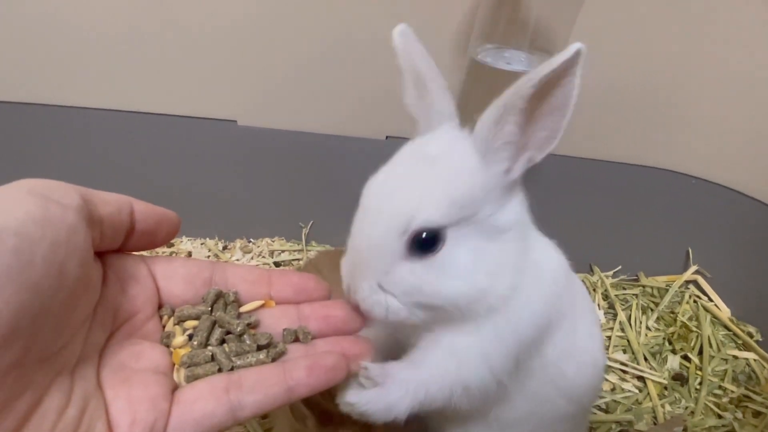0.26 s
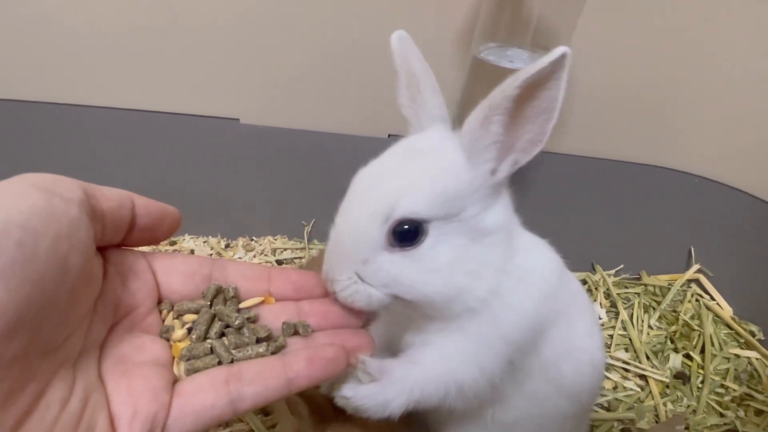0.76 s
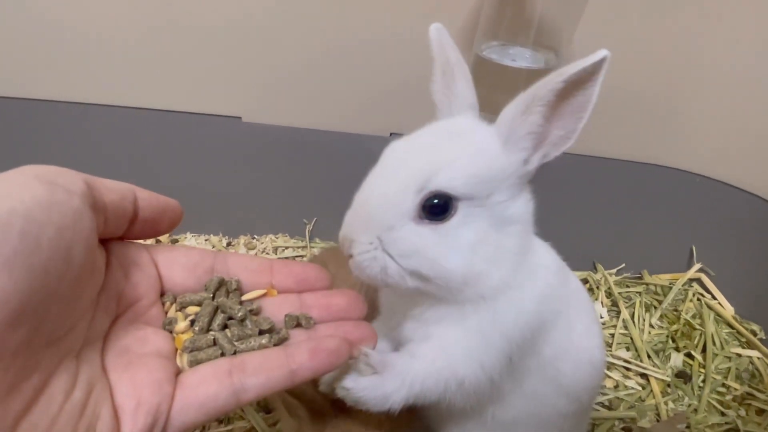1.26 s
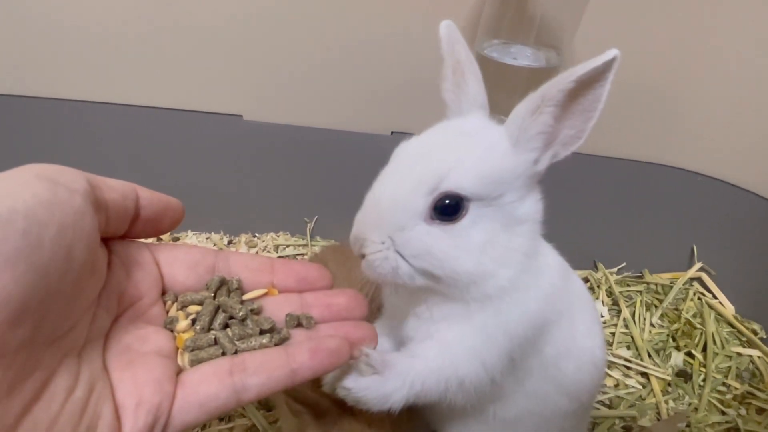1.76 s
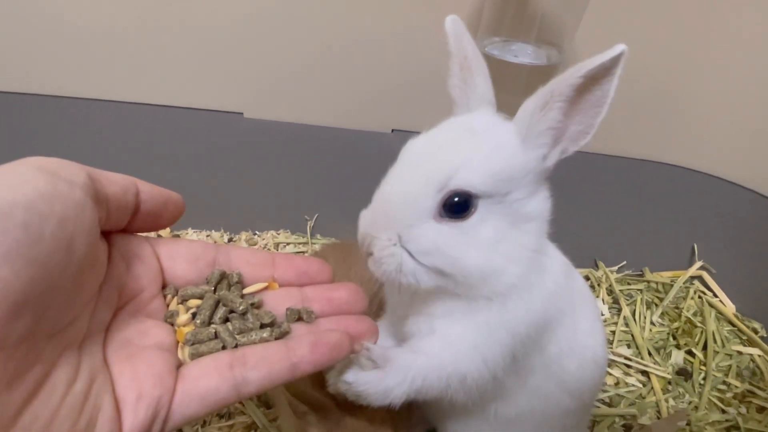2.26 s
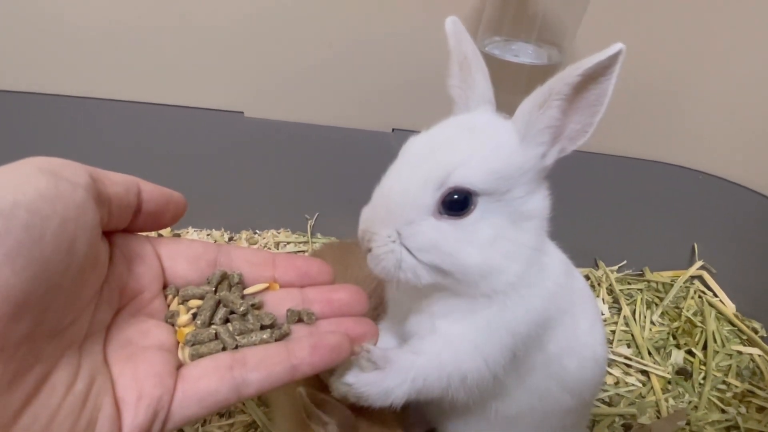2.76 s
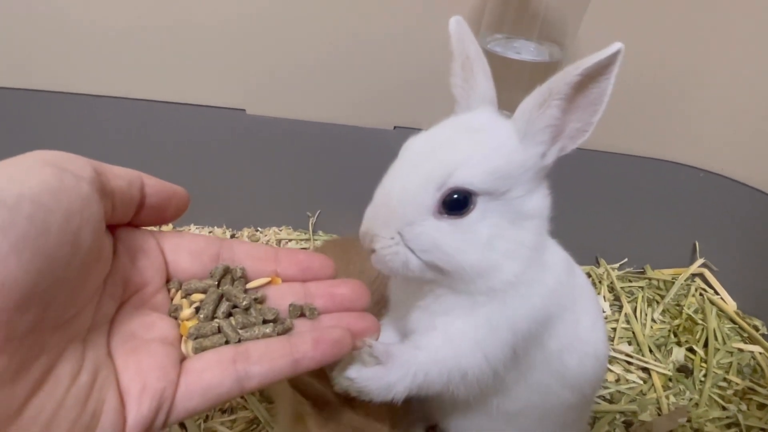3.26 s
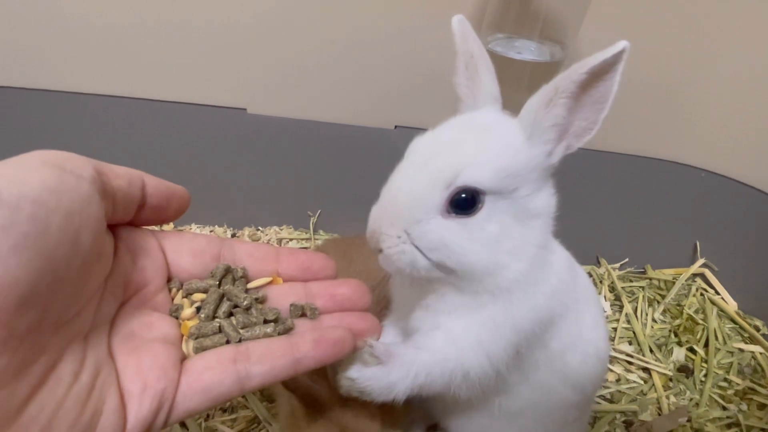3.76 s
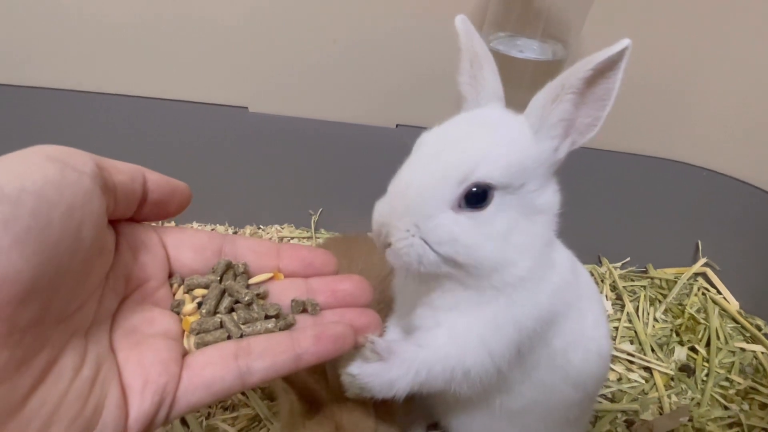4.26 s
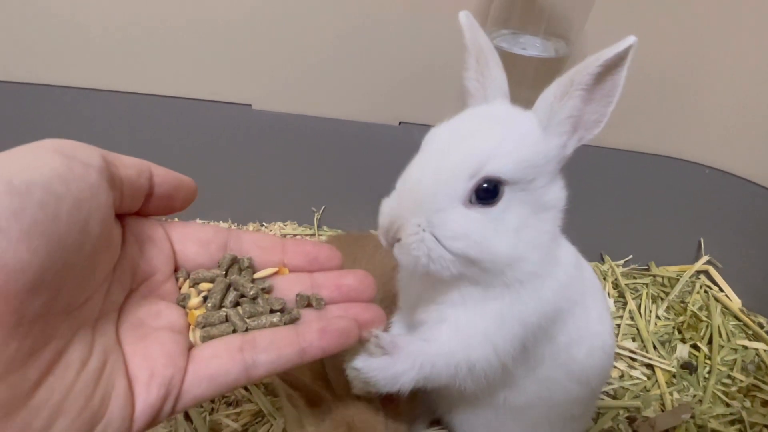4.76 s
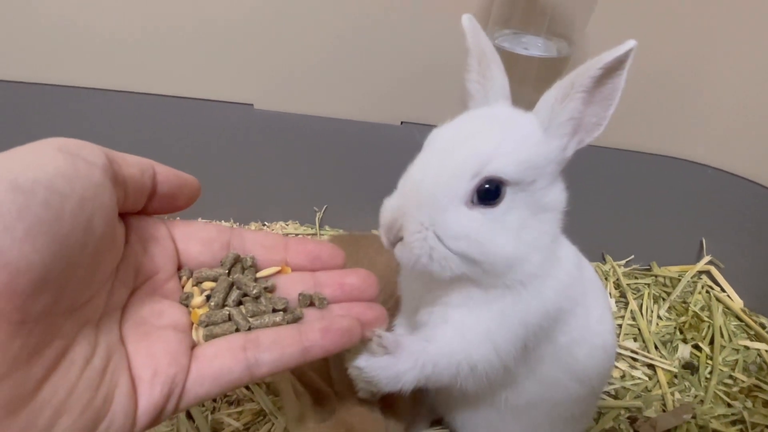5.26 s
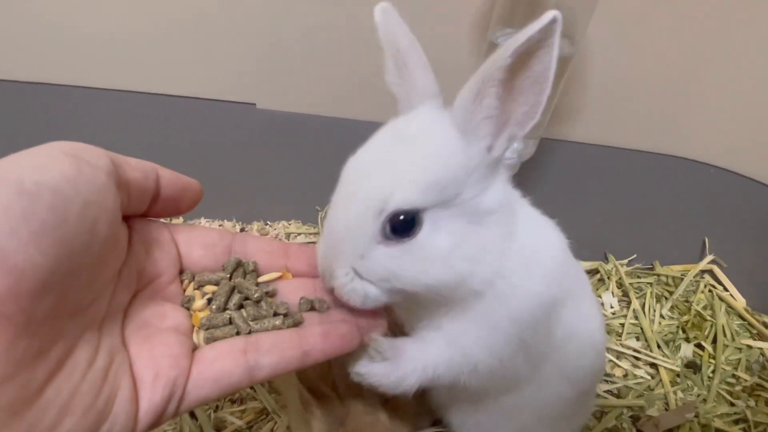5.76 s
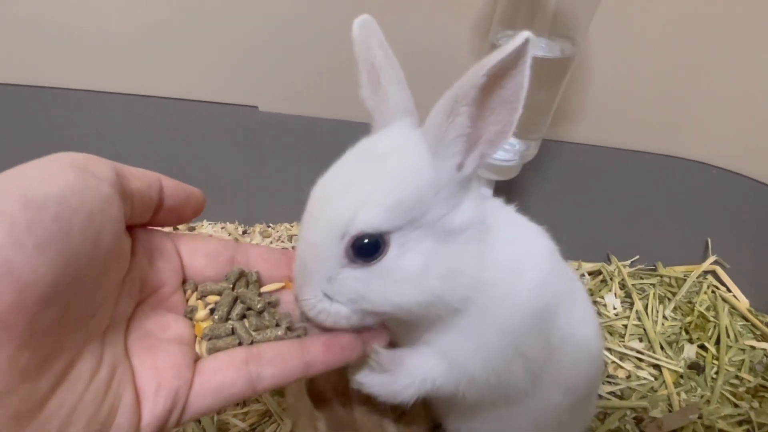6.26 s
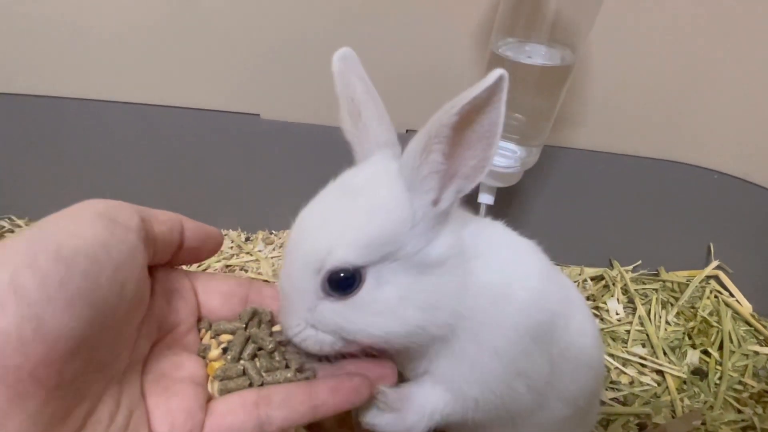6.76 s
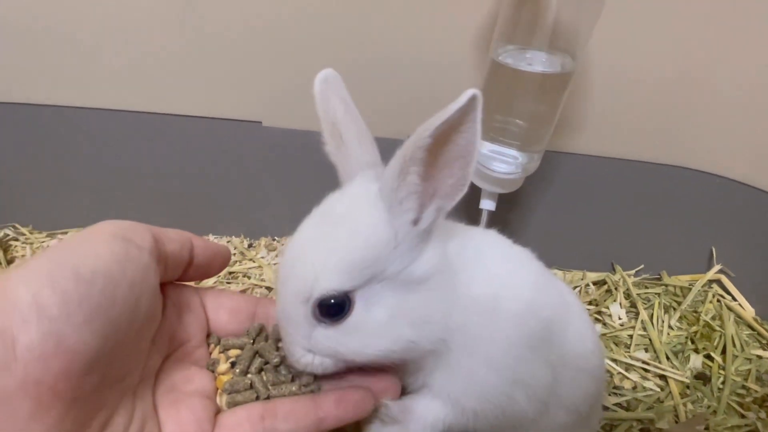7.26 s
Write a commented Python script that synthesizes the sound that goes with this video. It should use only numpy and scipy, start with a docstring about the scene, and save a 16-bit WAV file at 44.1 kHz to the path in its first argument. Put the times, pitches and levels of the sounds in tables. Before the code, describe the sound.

Close to the microphone in a small hay-lined indoor pen, a rabbit bites dry pellets. Faint hay ticks and a soft paw scuff come first, with a few light nibbles; after two seconds the crunches crowd together, woody and muffled with brittle snaps. Near the end hay swishes and paws scuff and press softly on the floor. A low appliance hum, rumble and faint hiss continue throughout.

```python
"""A small rabbit in a hay-lined pen indoors, close to a two-port microphone: coupled fracture and resonance.
Hay ticks and a paw scuff open the scene; pellet bites soon begin, knocking through the skull and crumbling,
and crowd together after two seconds. From about 5.5 s hay swishes and paw moves thicken to the end.
Throughout lie random hay grains, an appliance's mains hum in sines, and noise shaped into rumble and hiss."""
import sys
import numpy as np
from scipy import signal
from scipy.fft import rfft, irfft
from scipy.io import wavfile

SR = 44100
rng = np.random.default_rng(int(sys.argv[2]) if len(sys.argv) > 2 else 0)


def generate_wav(signal):
    """Clip the signal to [-1, 1] and save it as 16-bit WAV at the path in sys.argv[1]."""
    frames = np.transpose(np.atleast_2d(signal))
    scaled = np.clip(frames, -1, 1) * 32767
    pcm = np.round(scaled).astype(np.int16)
    wavfile.write(sys.argv[1], SR, pcm)


N = 330750

# Pellet bites, levels before filters and common gains: start_s, grind_db, main_db, main_hz, low_db, low_hz,
# sharp_db, sharp_hz, upper_db, crack_db, splinter_db, left_over_right_db
BITES = [(0.359, -49, -76, 1180, -61.5, 678, -70, 1550, -61.5, -79, -73, -4),
         (0.507, -53, -68, 960, -63, 600, -64, 1560, -66.5, -78, -75, 7),
         (0.512, -54, -62.5, 1160, -63, 860, -71, 1410, -82, -82, -82, 9.5),
         (1.311, -45, -69, 1210, -52, 660, -51, 1640, -50.5, -67.5, -65.5, -3.5),
         (1.995, -58, -75, 982, -69, 864, -75, 1650, -63, -69, -62, 4),
         (2.171, -58, -80, 1120, -60, 600, -63, 1660, -77, -87, -81, -2),
         (2.439, -43, -46.5, 1170, -53, 587, -48, 1420, -51.5, -67, -72, 13),
         (2.495, -48, -58.5, 1140, -72, 899, -71, 1560, -80, -87, -81, -14),
         (2.696, -54, -56.5, 1180, -66, 684, -59.5, 1480, -74, -84, -85, 6.5),
         (2.916, -51, -57, 1100, -63, 859, -56, 1680, -92, -75.5, -69, 8.0),
         (3.03, -62, -76, 991, -75, 657, -75, 1720, -64.5, -73, -71, 3.0),
         (3.104, -37.5, -44.5, 1120, -49, 900, -44.5, 1510, -44.5, -57, -66, 8),
         (3.329, -45, -52.5, 1230, -58, 780, -53, 1440, -53.5, -82, -72, 15.5),
         (3.384, -55, -69, 1050, -74, 744, -64, 1570, -71, -85, -88, 6),
         (3.596, -41, -58.5, 1110, -58, 630, -56.5, 1480, -60, -55.5, -61, 27.5),
         (3.818, -52, -80, 1170, -77, 864, -53.5, 1500, -85, -74, -76, 8),
         (4.065, -47, -63, 1170, -55, 610, -51.5, 1700, -68, -81, -78, 7),
         (4.073, -52, -62, 1120, -62.5, 890, -61, 1550, -71, -85, -77, 14.5),
         (4.078, -54, -76, 1110, -66, 619, -73, 1410, -63, -66, -71, 5),
         (4.227, -62, -66, 1040, -77, 883, -71, 1510, -77, -77, -79, 12),
         (4.271, -58, -65, 1120, -81, 619, -64, 1630, -79, -82, -88, 3),
         (4.502, -51, -59, 1170, -60, 710, -57.5, 1660, -58, -71, -75, 4),
         (4.521, -56, -68, 1190, -78, 864, -64, 1460, -70, -82, -70, 10),
         (4.702, -32.5, -43, 1180, -48, 750, -43.5, 1690, -41, -55.5, -64, 7),
         (4.743, -40, -47, 1120, -45.5, 704, -52, 1670, -48, -72.5, -84, 2.5),
         (5.039, -40.5, -64, 1130, -48, 708, -80, 1630, -59, -50, -44, 11.5),
         (5.438, -56.5, -59, 1130, -55.5, 765, -59, 1700, -64, -55, -49.5, 6.5),
         (5.698, -51, -79, 1060, -70, 608, -62, 1670, -79, -82, -69, 10),
         (5.803, -55, -78, 1050, -74, 821, -60.5, 1550, -66, -72, -65, 8),
         (6.0, -45, -57, 1190, -55.5, 830, -62, 1480, -62, -67, -67, 15),
         (6.089, -65, -73, 990, -77, 604, -70, 1670, -76, -80, -75, 4),
         (6.141, -63, -70, 1120, -78, 668, -66, 1640, -72, -82, -69, -1),
         (6.199, -52, -63, 1050, -75, 635, -74, 1680, -75, -80, -87, 8),
         (6.226, -49, -64.5, 1170, -75, 829, -73, 1650, -78, -74.5, -91, 12.5),
         (6.259, -58, -65, 1130, -60.5, 845, -72, 1660, -74, -77, -82, 17),
         (6.332, -49, -70, 1070, -67, 608, -74, 1440, -84, -69.5, -83, 12),
         (6.458, -54, -60.5, 1160, -76, 681, -63, 1460, -75, -78, -71, 4),
         (6.66, -52, -62, 1220, -64, 799, -54, 1470, -57, -74, -84, -2),
         (6.836, -42, -57, 1200, -61, 643, -56, 1780, -71, -74, -75, 0),
         (6.885, -41, -52.5, 1080, -49, 610, -54, 1440, -55, -69, -73, 9.5),
         (7.092, -52, -56, 1150, -79, 696, -55.5, 1830, -70, -73.5, -84, 1),
         (7.101, -58, -70, 1170, -77, 696, -69, 1800, -69, -82, -87, 5),
         (7.106, -57, -62, 1190, -64, 678, -64, 1830, -69, -73, -75, 8),
         (7.1143, -57, -68, 1180, -65, 730, -58, 1810, -72, -80, -83, -1)]
# Fixed skull modes, upper knock and one between it and the crack: centre_hz, width_hz, gain_db
SKULL_MODES = [(1967, 270, 11.5), (2250, 720, 18.5)]
# Modes of the brittle crack: centre_hz, width_hz, gain_db
CRACK_MODES = [(3170, 2700, 10), (3810, 1200, 5), (4920, 1100, -5), (7230, 1870, 0), (8140, 2300, -13.5)]
# Reflections from the pen walls: delay_ms, left_db, right_db
PEN_ECHOES = [(2.2, -52, -47), (3.6, -65, -10.5), (11, -39, -13), (17, -22, -21)]
# Thin ticks of hay stalks and crumbs, before the treble band: start_s, level_db
HAY_TICKS = [(0.0218, -52), (0.043, -53), (0.2244, -57), (0.4579, -50), (0.5038, -52), (0.7607, -51),
             (0.8629, -54), (1.033, -43), (1.059, -50), (2.6624, -45), (2.939, -49), (3.029, -57),
             (4.1255, -52), (4.8035, -53), (5.5508, -52), (5.5752, -46), (5.597, -59), (5.716, -55),
             (5.8965, -46), (5.912, -49), (5.922, -32), (5.94, -43), (5.968, -54), (6.063, -43),
             (6.0801, -48), (6.362, -43.5), (6.5425, -60), (6.562, -34), (6.69, -42), (6.8568, -47),
             (6.9042, -37)]
# Steady bedding rustle, before its random drift: time_s, level_db
BEDDING_RUSTLE = [(0.0, -87), (1.1, -88.5), (1.35, -87.5), (2.2, -87.5), (5.0, -88), (5.45, -87),
                  (5.6, -82), (6.0, -89.5), (6.9, -84), (7.5, -81)]
# Brief swishes of hay, before the same drift: peak_s, level_db
HAY_SWISHES = [(1.56, -82), (5.57, -86), (5.75, -81), (5.92, -68.5), (6.07, -79), (6.31, -76), (6.36, -83),
               (6.56, -66), (6.67, -80), (6.9, -78)]
# Spectral shape of the rustle: frequency_hz, density_db
HAY_SPECTRUM = [(4410, -33), (7500, 6.5), (8070, 3), (8840, -12), (9420, -5.5), (12600, 4), (14400, -11.5),
                (15200, -20), (16000, -54)]
# Paw moves, before port gains and drift: peak_s, rise_s, fall_s, drag_db, scuff_db, scuff_hz, scuff_width_hz,
# push_db (on the pen floor)
PAW_MOVES = [(.02, 0.14, .14, -86.5, -90.5, 1950, 400, -68), (.33, .09, 0.058, -100, -87, 2050, 300, -71),
             (5.65, 0.36, .27, -95, -97, 1290, 450, -63.5), (6.096, 0.26, 0.39, -87, -103, 1300, 450, -78),
             (6.59, 0.036, 0.039, -73.5, -75.5, 2900, 300, -52),
             (6.63, 0.02, 0.013, -66, -69, 2100, 494, -53), (6.66, 0.024, 0.032, -80, -88, 1300, 600, -61),
             (6.7, .02, 0.073, -81.5, -85.5, 2800, 350, -70), (6.9, 0.11, 0.024, -80, -84, 2600, 700, -52),
             (6.99, 0.039, 0.045, -79.5, -86, 2780, 500, -57.5),
             (7.45, 0.14, .13, -83, -99, 1230, 400, -57)]
# Spectral shape of the drag through stalks: frequency_hz, density_db
DRAG_SPECTRUM = [(150, -11), (300, -3.5), (600, -1.5), (1100, 1.5), (1500, -2), (2000, -9.5), (3100, -9),
                 (3600, -11), (4500, -19.5), (6500, -15.5), (9000, -49), (12000, -90)]
# Mains hum, before its waver: frequency_hz, rms_db, left_over_right_db
MAINS_HUM = [(119.64, -54, 4), (360, -96, -3)]
# Rumble envelope, before its lumps: time_s, level_db
RUMBLE_LEVEL = [(0.0, -57), (0.2, -58.5), (0.5, -54.5), (1.0, -55.5), (1.5, -58), (2.2, -56.5), (2.7, -55),
                (3.3, -55), (3.8, -55.5), (4.5, -56), (5.0, -55), (5.5, -57.5), (6.3, -53), (7.0, -53),
                (7.5, -55)]
# Spectral shape of the rumble: frequency_hz, density_db
RUMBLE_SPECTRUM = [(18, -41), (30, -44), (45, -29.5), (60, 10), (100, 4.5), (130, 3.5), (170, -5.5),
                   (210, -11), (300, -25), (450, -61), (1200, -100)]
# Room modes where rumble gathers, mean level: centre_hz, width_hz, rms_db
ROOM_MODES = [(59.9, 4.9, -62), (66.4, 4.3, -58), (285, 18, -77.5)]
# Envelope of the deepest rumble: time_s, level_db
DEEP_LEVEL = [(0, -76.5), (2.5, -66), (3.8, -65), (4.4, -59), (5.3, -61.5), (6.0, -60.5), (7.5, -67)]
# Spectral shape of the hiss: frequency_hz, density_db
HISS_SPECTRUM = [(150, -29.5), (250, -4.5), (334, -9), (585, -13), (1170, -15), (2390, -26), (5140, -27),
                 (5600, -26.5), (6530, -27), (7480, -28), (8280, -29.5), (9480, -38.5), (12700, -38),
                 (13800, -64), (14500, -65)]
# Lean of the hiss between the ports: frequency_hz, left_over_right_db
HISS_LEAN = [(60, 21), (150, -6), (380, 3.5), (950, 1.5), (2380, 1.5), (5980, 5.5), (15000, -1)]
# Faint fluttering patches of room tone, before flutter: centre_hz, width_hz, rms_db
FLUTTER_PATCHES = [(606, 160, -86.5), (858, 68, -84), (1087, 86, -82), (1400, 150, -97), (1930, 250, -92)]
# Correlation of diffuse noise at the two ports: frequency_hz, likeness (-1 to 1)
PORT_LIKENESS = [(60, 0.95), (130, 0.64), (290, 0.36), (640, -0.17), (1400, -0.054), (3000, -0.0044),
                 (12000, -0.14)]
# Dips in the microphone response: centre_hz, width_hz, depth_db
PORT_NOTCHES = [(5610, 295, -21), (7480, 690, -13)]

FAR_PORT_LAG, TREBLE_LAG = 20, 5   # samples
MAIN_WIDTH_HZ, LOW_WIDTH_HZ, SHARP_WIDTH_HZ = 200, 338, 265
MAIN_GAIN_DB, LOW_GAIN_DB, SHARP_GAIN_DB = 11.3, 14.85, 9.2
SQUEEZE_MS, SQUEEZE_DB = 1.2, -28   # creak under load before the break
CRUMBLE_MS, LATER_BREAKS = 5, 0.6   # decay; size factor of later breaks
GRIND_MS, GRIND_DB = 40, -16   # decay; gain on each bite's grind_db
CRACK_MS, CRACK_BRIGHTENS = 4, 0.4   # decay; dB per octave for each dB of splinters over crack
SPRAY_GAIN_DB = 6.0   # common to crack and splinters
CRACK_TO_WALLS_DB = -5   # little of the crack leaves the mouth toward the walls
ROOM_T60_S, ROOM_BUILD_S, ROOM_DB, WALL_CUT_HZ = 0.17, 0.028, -18.5, 5700
TICK_FADE_MS, SWISH_RISE_S, SWISH_FALL_S = 2.9, 0.046, 0.049
PUSH_LAG_S, HOLD = 0.055, 1.3   # the weight comes down after the drag; HOLD flattens the drag's peak
HUM_WAVER_DB, HISS_DB = 2.0, -69
FLUTTER_DB, FLUTTER_HZ = 4.0, 5.0   # depth, pace
CUTOFF_HZ = 16500   # upper edge of the sound


def amp(db):
    """Logarithmic level: decibels become a linear amplitude gain."""
    return 10 ** (np.asarray(db) / 20)


def rms_one(x):
    """Power normalisation: scale to unit root-mean-square."""
    return x / np.sqrt(np.mean(x ** 2) + 1e-20)


def in_time(rows):
    """Linear interpolation: a level curve read at each sample."""
    s, level = np.transpose(rows)
    return np.interp(np.arange(N) / SR, s, level)


def at_hz(points):
    """Logarithmic frequency scale: a spectrum read on the transform grid."""
    hz, value = np.transpose(points)
    return np.interp(np.log(np.fft.rfftfreq(N, 1 / SR) + 1), np.log(hz), value)


def colour(x, spectrum):
    """Spectral shaping: weight a steady signal by frequency, at unit rms."""
    return rms_one(irfft(rfft(x) * amp(at_hz(spectrum)), N))


def late(x, samples):
    """Propagation delay: shift by whole samples."""
    return np.concatenate([np.zeros(samples), x[:N - samples]])


def drift(rate_hz):
    """Low-passed chance: a slow random curve of unit rms, computed every 40 samples."""
    r = np.exp(-80 * np.pi * rate_hz / SR)
    chance = rng.standard_normal(N // 40 + 2002)
    slow = signal.lfilter([1], [1, -2 * r, r * r], chance)[2000:]
    return np.interp(np.arange(N) / 40, np.arange(len(slow)), rms_one(slow))


def ring(x, hz, width_hz):
    """Damped resonance: a unit click rings as a decaying sine of initial height 1."""
    r, w = np.exp(-np.pi * width_hz / SR), 2 * np.pi * hz / SR
    return signal.lfilter([0, np.sin(w)], [1, -2 * r * np.cos(w), r * r], x + 1e-18)


def diffuse():
    """Spatial coherence: two white noises, alike in the bass and nearly unrelated above."""
    mid, side = rfft(rng.standard_normal((2, N)))
    alike = np.clip(at_hz(PORT_LIKENESS), -1, 1)
    return irfft(np.sqrt(1 + alike) * mid + np.sqrt(1 - alike) * side * [[1], [-1]], N)


def grains(per_s, spread_db):
    """Random fracture: sparse impulses, mostly small and a few large."""
    sizes = amp(spread_db * np.minimum(rng.exponential(1, N), 5)) * rng.choice([-1, 1], N)
    return sizes * (rng.random(N) < per_s / SR)


def bursts(times, db, fade_ms, draws):
    """Energy release: each event is a spray of draws under exponential decay."""
    out, age = np.zeros(N), np.arange(draws.shape[1]) / SR
    decay = np.exp(-1000 * age / fade_ms)
    for s, gain, draw in zip(times, amp(db), draws):
        i = round(s * SR)
        out[i:i + len(age)] += (gain * draw * decay)[:N - i]
    return out


def swells(times, rise_s, fall_s):
    """Exponential growth and decay: one envelope of height 1 for each time."""
    age = np.arange(N) / SR - np.asarray(times)[:, None]
    rise, fall = np.reshape(rise_s, (-1, 1)), np.reshape(fall_s, (-1, 1))
    return np.exp(np.minimum(age / rise, -age / fall))


def treble_ports(x):
    """Phase difference: short waves reach the ports in opposite sense, a few samples apart."""
    return np.array([late(x, TREBLE_LAG), -x])


def room(x):
    """Reverberation: a short dense tail, duller than the source, independent on each side."""
    age = np.arange(SR // 2) / SR
    tail = rng.standard_normal((2, len(age))) * amp(-60 * age / ROOM_T60_S)
    tail = tail * np.clip(age / ROOM_BUILD_S, 0, 1)
    tail = signal.sosfilt(signal.butter(1, WALL_CUT_HZ, fs=SR, output="sos"), tail)
    tail = tail / np.sqrt(np.sum(tail[0] ** 2))
    return amp(ROOM_DB) * signal.fftconvolve(x[None], tail, axes=1)[:, :N]


def bites():
    """Modal excitation by fracture: a pellet creaks, breaks in steps, cracks, splinters and is ground."""
    (s, grind_db, main_db, main_hz, low_db, low_hz, sharp_db, sharp_hz,
     upper_db, crack_db, splinter_db, pan_db) = np.transpose(BITES)
    tilt_db = CRACK_BRIGHTENS * (splinter_db - crack_db + 6.0)
    draws = rng.standard_normal((len(s), 4, 5000))
    steps = LATER_BREAKS * np.tanh(draws[:, 0]) * (abs(draws[:, 1]) > 2.15)   # sparse later breaks
    steps[:, [0, 20]] = -.3, 1   # the teeth seat, then the pellet gives
    crumbs = draws[:, 3] * (abs(draws[:, 1]) > 2.25)
    lead, wait = 300, 500   # samples of creak, and until the grinding
    age_ms = np.arange(5000) * 1000 / SR
    sides, grind = np.zeros((2, N + SR)), np.zeros(N + SR)
    for k, i in enumerate((s * SR).astype(int)):
        creak = amp(SQUEEZE_DB) * draws[k, 2, -lead:] * np.exp(-age_ms[lead:0:-1] / SQUEEZE_MS)
        blow = np.concatenate([creak, steps[k] * np.exp(-age_ms / CRUMBLE_MS)])
        modes = [(main_hz[k], MAIN_WIDTH_HZ, MAIN_GAIN_DB), (low_hz[k], LOW_WIDTH_HZ, LOW_GAIN_DB),
                 (sharp_hz[k], SHARP_WIDTH_HZ, SHARP_GAIN_DB), *SKULL_MODES]
        between_db = (upper_db[k] + crack_db[k]) / 2 - tilt_db[k]
        strength = [main_db[k], low_db[k], sharp_db[k], upper_db[k], between_db]
        knock = sum(sign * amp(own_db + mode_db) * ring(blow, hz, width_hz)
                    for (hz, width_hz, mode_db), own_db, sign in zip(modes, strength, [1, -1, -1, 1, -1]))
        sides[:, i - lead:i + len(age_ms)] += np.outer(amp([pan_db[k] / 2, -pan_db[k] / 2]), knock)
        grit = amp(grind_db[k] + GRIND_DB) * crumbs[k] * np.exp(-age_ms / GRIND_MS)
        ground = amp(18.0) * grit
        ground = ground + amp(-6) * ring(grit, main_hz[k], MAIN_WIDTH_HZ)
        ground = ground + amp(-5.5) * ring(grit, sharp_hz[k], SHARP_WIDTH_HZ)
        grind[i + wait:i + wait + len(grit)] += ground
    # cheeks pass only the middle range; the closed mouth dulls the grinding
    cheeks = signal.butter(3, [560, 3100], "band", fs=SR, output="sos")
    mouth = signal.butter(2, [800, 2400], "band", fs=SR, output="sos")
    sides = signal.sosfilt(cheeks, sides[:, :N] + 1e-18)
    grind = signal.sosfilt(mouth, grind[:N] + 1e-18)
    crack = brittle_crack(s, crack_db, tilt_db, .5 * draws[:, 2] + 4.2 * steps)
    far = late(amp(-6.0) * sides[1] + amp(-4.0) * crack + amp(-13.0) * grind, FAR_PORT_LAG)
    whole = (sides[0] + sides[1]) / 2 + amp(CRACK_TO_WALLS_DB) * crack
    chewing = np.array([sides[0] + crack + grind, far]) + pen_walls(whole) + room(whole)
    splinters = bursts(s, splinter_db + SPRAY_GAIN_DB, CRACK_MS, draws[:, 1])
    return chewing, splinters


def brittle_crack(s, crack_db, tilt_db, breaks):
    """Brittle fracture: a brief spray of fine breaks excites broad modes of alternating sign."""
    crack = np.zeros(N)
    for k, (hz, width_hz, mode_db) in enumerate(CRACK_MODES):
        octaves = np.log2(hz / CRACK_MODES[2][0])
        spray = bursts(s, crack_db + SPRAY_GAIN_DB + tilt_db * octaves, CRACK_MS, breaks)
        crack += (-1) ** k * amp(mode_db) * ring(spray, hz, width_hz)
    return crack


def pen_walls(x):
    """Early reflection: delayed copies of alternating sign, weighted for each port."""
    return sum(np.outer(amp([left_db, right_db]), late(x, round(ms * SR / 1000))) * (-1) ** k
               for k, (ms, left_db, right_db) in enumerate(PEN_ECHOES))


def hay(splinters):
    """Granular friction: dense fine grains rustle; lone ticks and pellet splinters snap in the treble."""
    s, db = np.transpose(HAY_TICKS)
    ticks = bursts(s, db, TICK_FADE_MS, rng.standard_normal((len(s), 1200)))
    band = signal.butter(4, [8500, 15500], "band", fs=SR, output="sos")
    snaps = signal.sosfilt(band, amp(-13.5) * ticks + amp(-1.5) * splinters)
    snaps = snaps + amp(4.0) * room(snaps)[0]
    snaps = snaps + amp(-17) * ring(snaps, 13500, 3100)   # bright port resonance
    swish_s, swish_db = np.transpose(HAY_SWISHES)
    swishes = amp(swish_db) @ swells(swish_s, SWISH_RISE_S, SWISH_FALL_S)
    rustle_db = 20 * np.log10(amp(in_time(BEDDING_RUSTLE)) + swishes)
    rustle = colour(grains(2500, spread_db=2.0), HAY_SPECTRUM)
    top = signal.sosfilt(signal.butter(8, 13900, "high", fs=SR, output="sos"), rustle)
    body = signal.sosfilt(signal.butter(8, 13900, fs=SR, output="sos"), rustle)
    # below -95 dB the top of the rustle fades faster than its body
    top = top * amp(np.minimum(2.4 * (rustle_db + 95), 0))
    rustle = (body + top) * amp(rustle_db + 2.0 * drift(15))
    return treble_ports(rustle + snaps)


def paws():
    """Stick-slip friction and floor resonance: paws drag and scuff in stalks, then press the hollow floor."""
    s, rise_s, fall_s, drag_db, scuff_db, scuff_hz, width_hz, push_db = np.transpose(PAW_MOVES)
    moves = np.tanh(HOLD * swells(s, rise_s, fall_s)) / np.tanh(HOLD)   # a drag holds its level a while
    slips = grains(2500, spread_db=5.5)
    scuff = sum(amp(db) * move * rms_one(ring(ring(slips, hz, w), hz, w))
                for db, move, hz, w in zip(scuff_db, moves, scuff_hz, width_hz))
    drag = amp(drag_db) @ moves * colour(slips, DRAG_SPECTRUM)
    drag = (drag + scuff) * amp(2.7 * drift(30))
    # noise partly shared by the ports rings the floor
    pressure = rng.standard_normal((2, N)) + 2.0 * rng.standard_normal(N)
    push = rms_one(ring(pressure, 144, 110))
    push = push * (amp(push_db) @ swells(s + PUSH_LAG_S, rise_s, fall_s))
    ports = np.array([amp(4.0) * drag, amp(8.0) * late(drag, FAR_PORT_LAG)])
    return ports + amp(21.5) * room(drag) + push


def mains_hum():
    """Periodic vibration: an appliance's sines share one slow random waver."""
    t = np.arange(N) / SR
    tones = sum(np.outer(amp([db + lean_db / 2, db - lean_db / 2]), np.sqrt(2) * np.sin(2 * np.pi * hz * t))
                for hz, db, lean_db in MAINS_HUM)
    return tones * amp(HUM_WAVER_DB * drift(5.9))


def rumble():
    """Modal density: low noise gathers in separate room modes and comes in lumps."""
    level = amp(in_time(RUMBLE_LEVEL) + 0.56 * drift(12.0))
    air = diffuse()
    modes = sum(amp(db) * rms_one(ring(air, hz, w)) for hz, w, db in ROOM_MODES)
    broad = colour(diffuse(), RUMBLE_SPECTRUM) * amp([[.8], [-.8]])
    deep = amp(in_time(DEEP_LEVEL)) * rms_one(ring(ring(diffuse(), 44, 18), 44, 18))
    return level * (broad + modes / level.mean()) + deep


def hiss():
    """Broadband noise: diffuse hiss leans between the ports by frequency and ends below the top treble."""
    lean = amp(np.outer([.5, -.5], at_hz(HISS_LEAN)))
    noise = amp(HISS_DB) * colour(irfft(rfft(diffuse()) * lean, N), HISS_SPECTRUM)
    return signal.sosfilt(signal.butter(8, 13800, fs=SR, output="sos"), noise)


def fluttering_patches():
    """Amplitude modulation: faint bands of room tone come and go independently."""
    air = diffuse()
    return sum(amp(db + FLUTTER_DB * drift(FLUTTER_HZ)) * rms_one(ring(air, hz, w))
               for hz, w, db in FLUTTER_PATCHES)


def background():
    """Superposition: the steady sounds of the room add linearly."""
    return mains_hum() + rumble() + hiss() + fluttering_patches()


def scene():
    """Superposition: all sources add at the two ports."""
    chewing, splinters = bites()
    return chewing + hay(splinters) + paws() + background()


def record(dry):
    """Transducer response: the microphone drops deep bass and dips twice; the sound ends near 16.5 kHz."""
    heard = signal.sosfilt(signal.butter(4, 42, "high", fs=SR, output="sos"), dry)
    for hz, width_hz, db in PORT_NOTCHES:
        peak = signal.lfilter(*signal.iirpeak(hz, hz / width_hz, SR), heard)
        heard = heard - (1 - amp(db)) * peak
    return signal.sosfilt(signal.cheby2(12, 70, CUTOFF_HZ, fs=SR, output="sos"), heard)


dry = scene()
out = record(dry)
generate_wav(out)
```